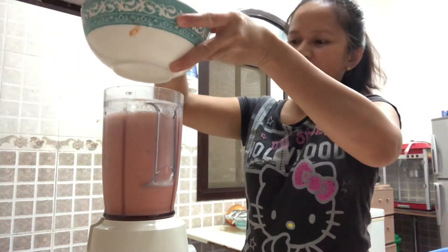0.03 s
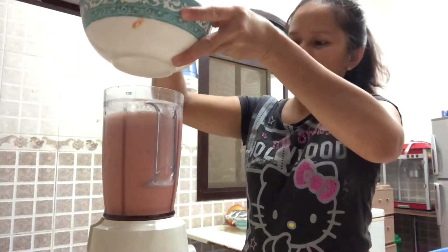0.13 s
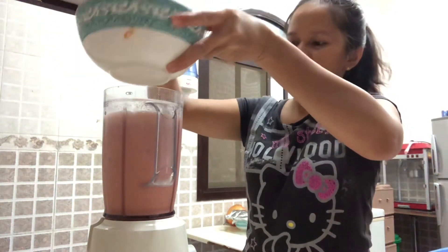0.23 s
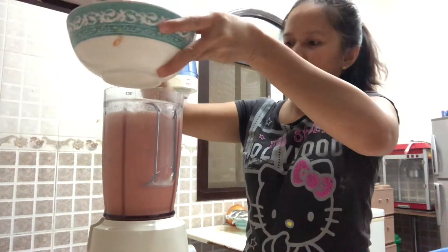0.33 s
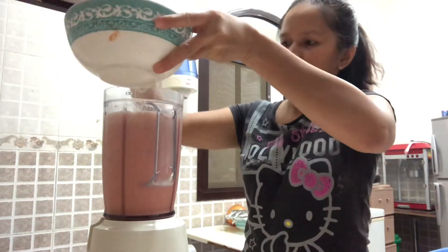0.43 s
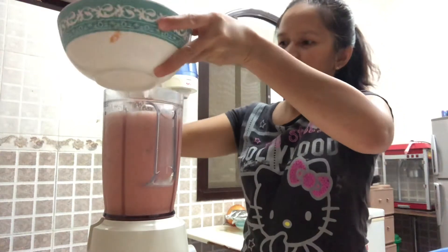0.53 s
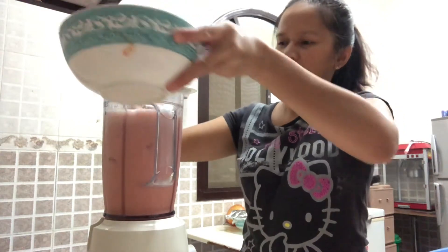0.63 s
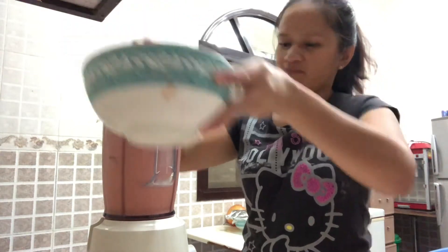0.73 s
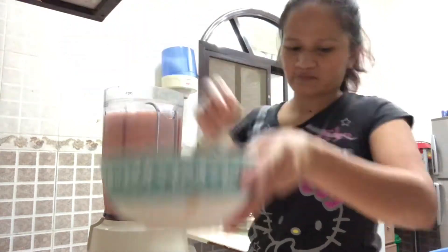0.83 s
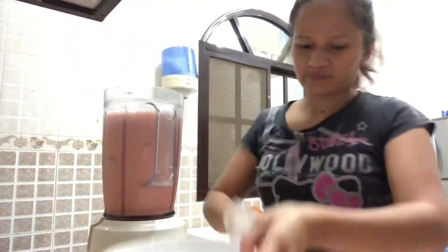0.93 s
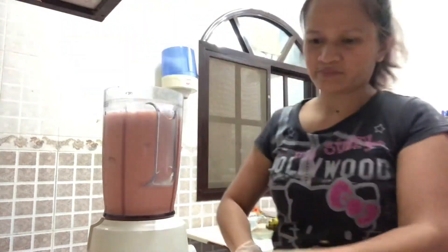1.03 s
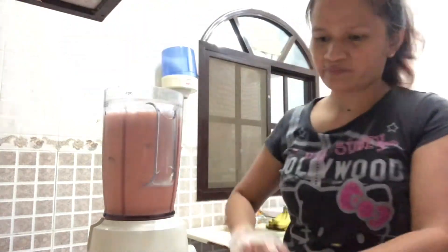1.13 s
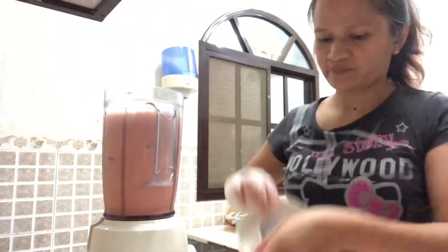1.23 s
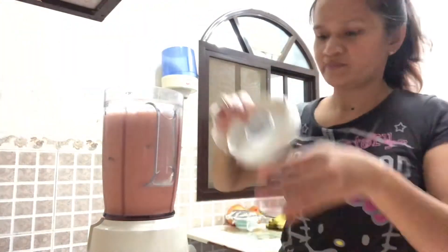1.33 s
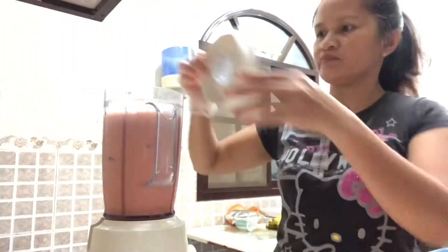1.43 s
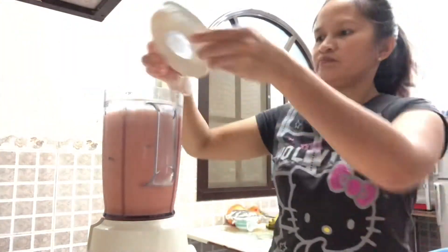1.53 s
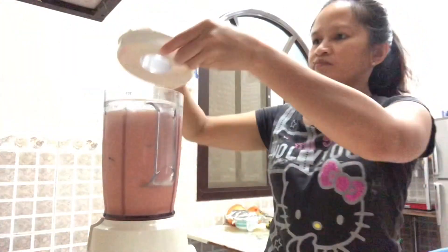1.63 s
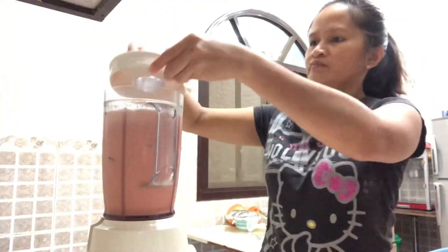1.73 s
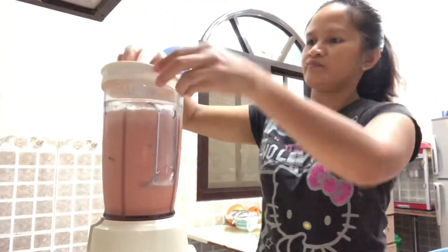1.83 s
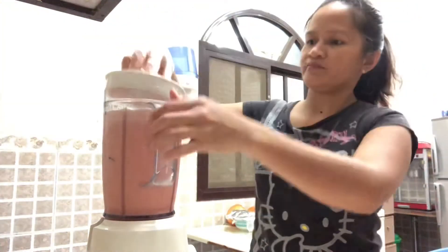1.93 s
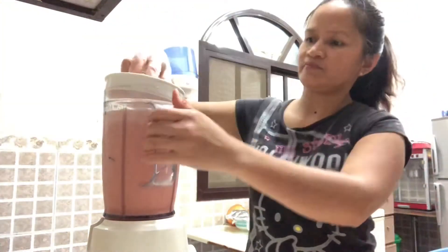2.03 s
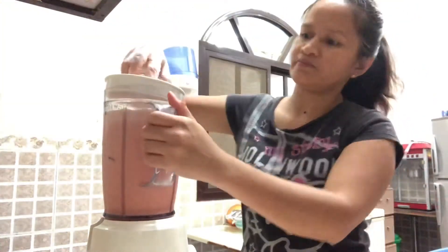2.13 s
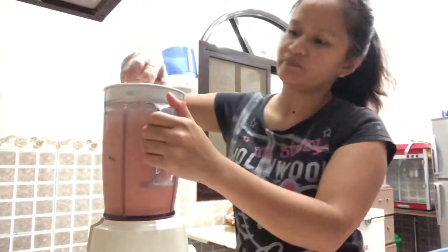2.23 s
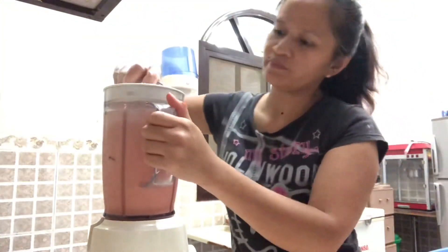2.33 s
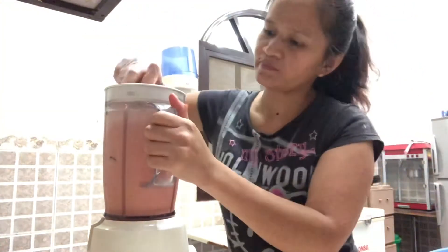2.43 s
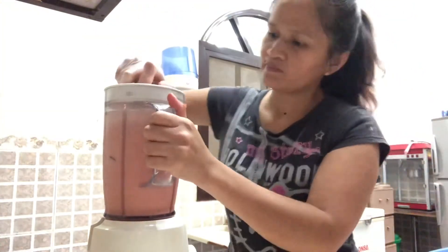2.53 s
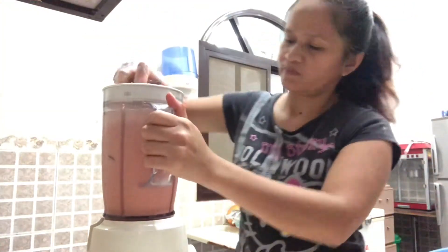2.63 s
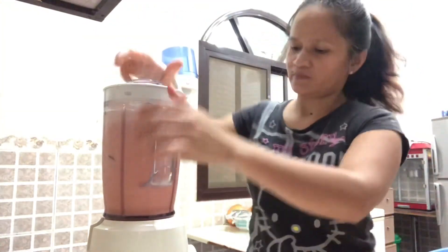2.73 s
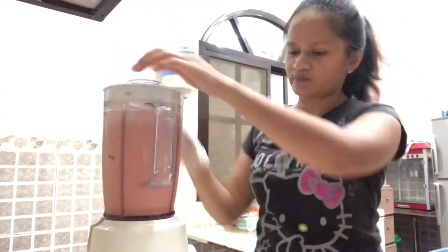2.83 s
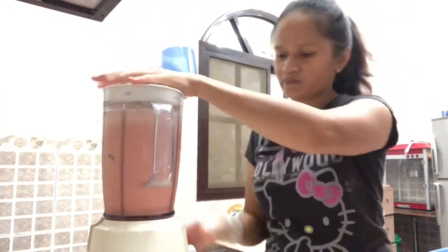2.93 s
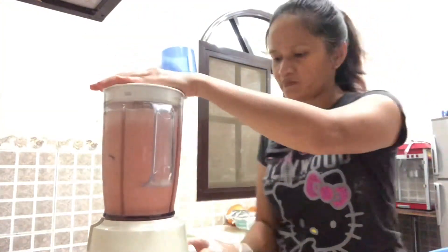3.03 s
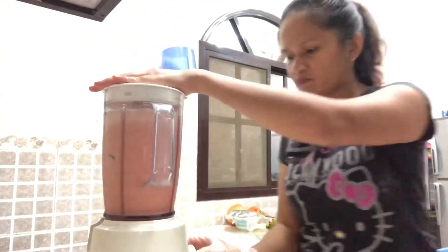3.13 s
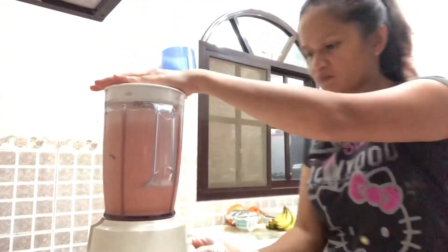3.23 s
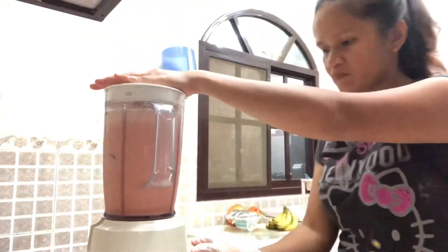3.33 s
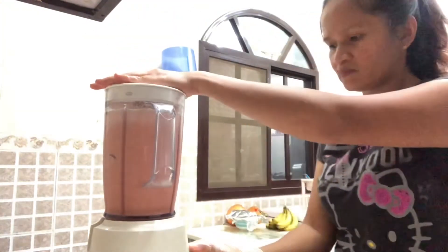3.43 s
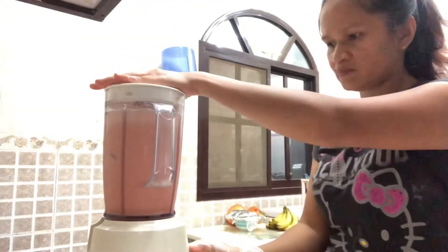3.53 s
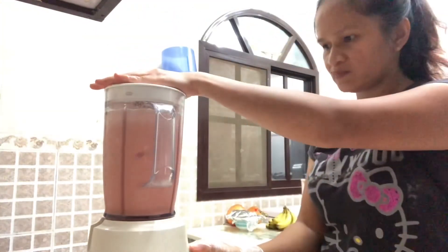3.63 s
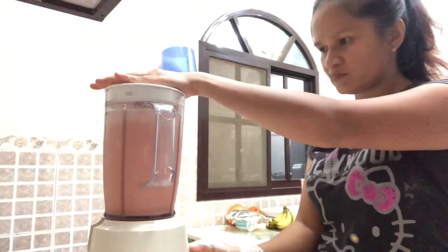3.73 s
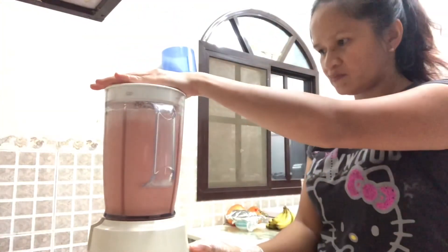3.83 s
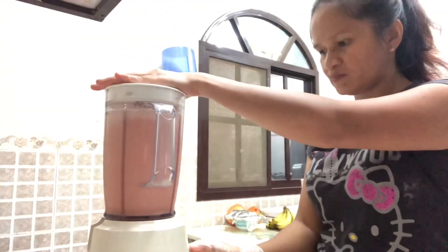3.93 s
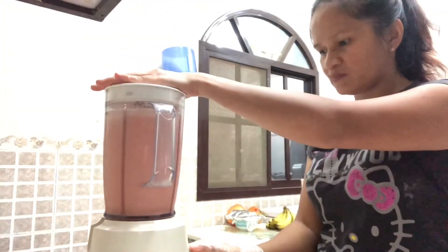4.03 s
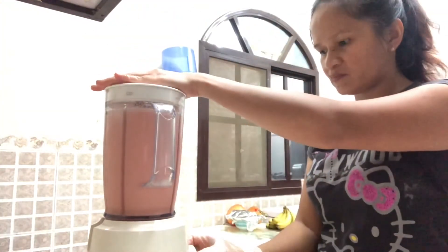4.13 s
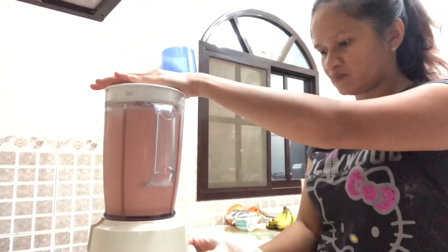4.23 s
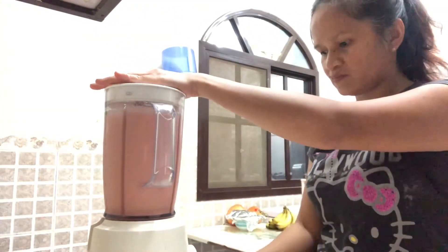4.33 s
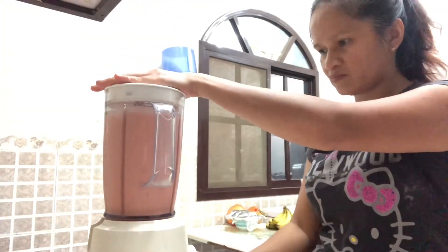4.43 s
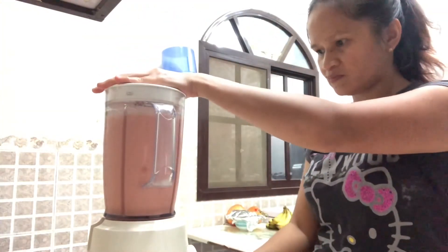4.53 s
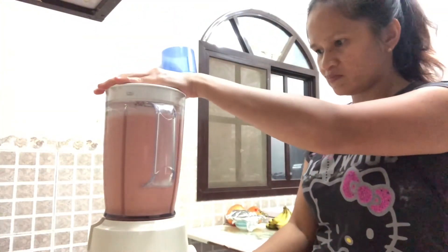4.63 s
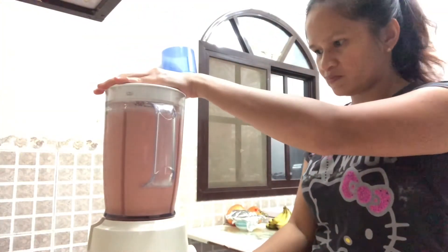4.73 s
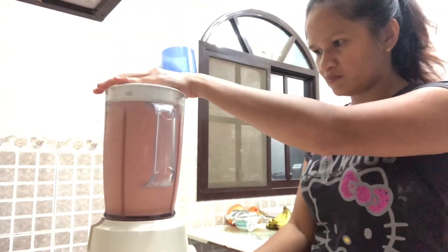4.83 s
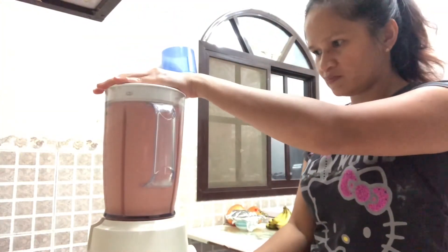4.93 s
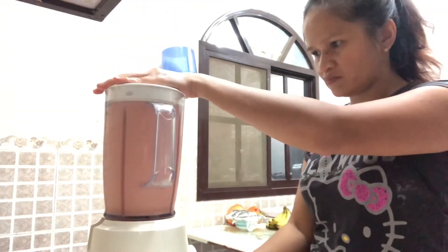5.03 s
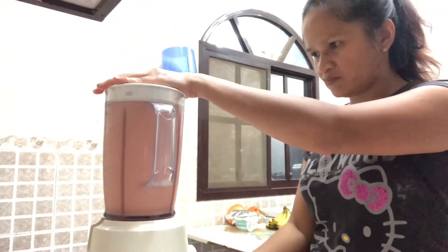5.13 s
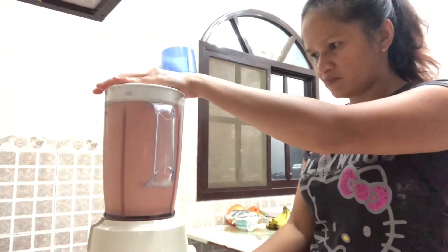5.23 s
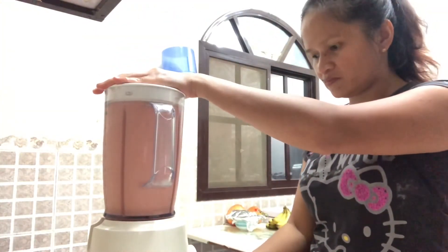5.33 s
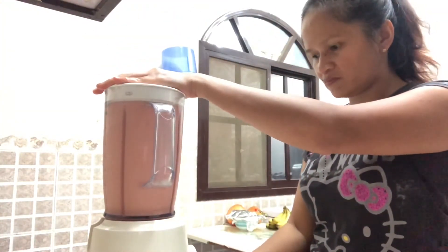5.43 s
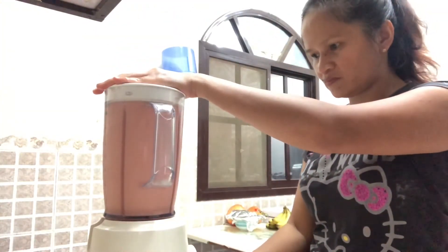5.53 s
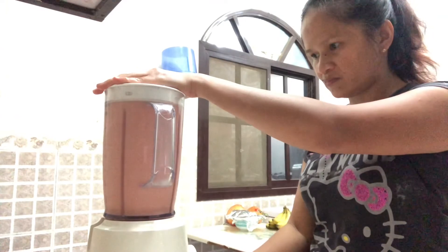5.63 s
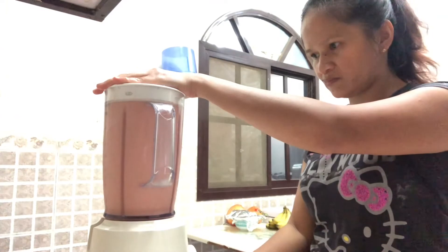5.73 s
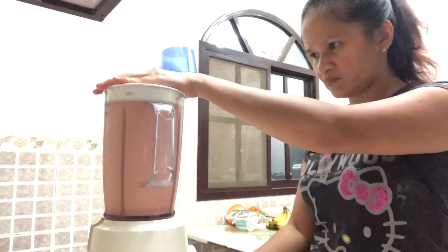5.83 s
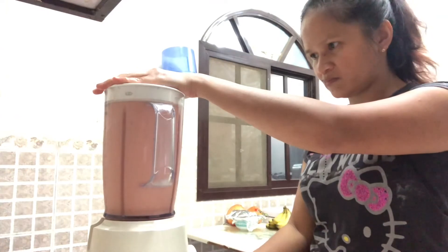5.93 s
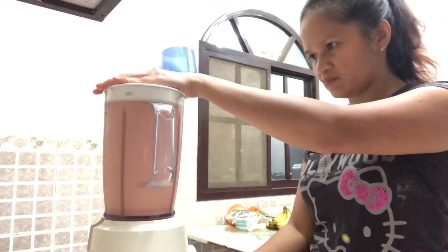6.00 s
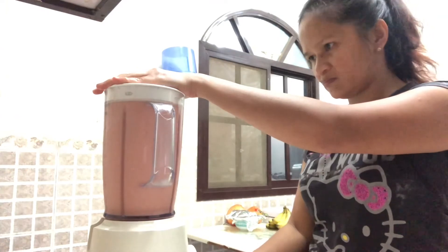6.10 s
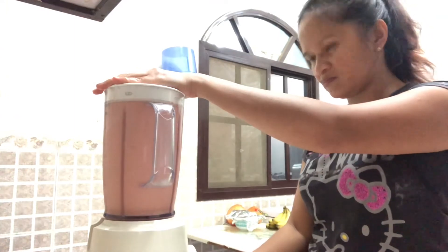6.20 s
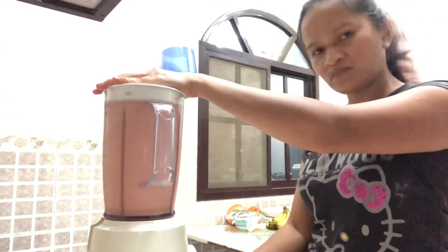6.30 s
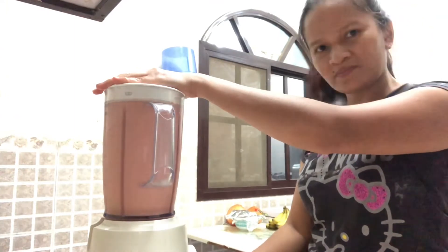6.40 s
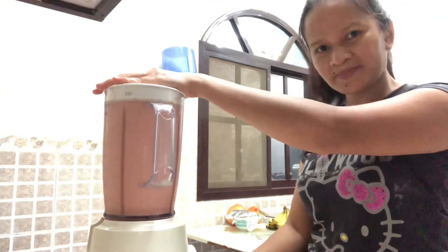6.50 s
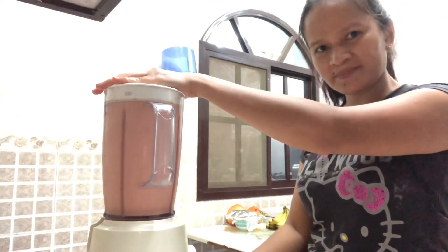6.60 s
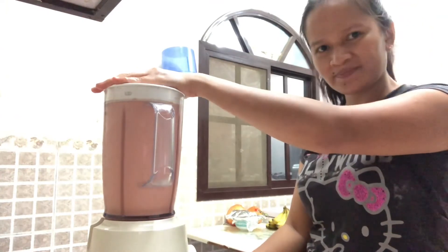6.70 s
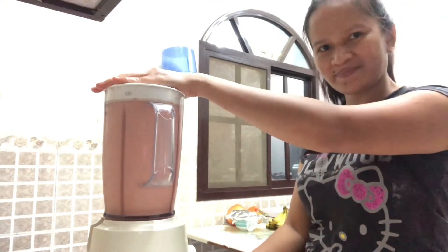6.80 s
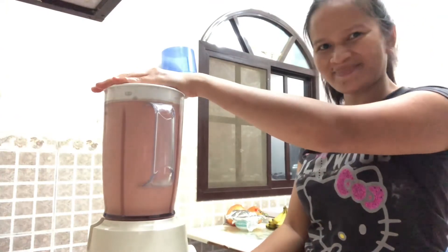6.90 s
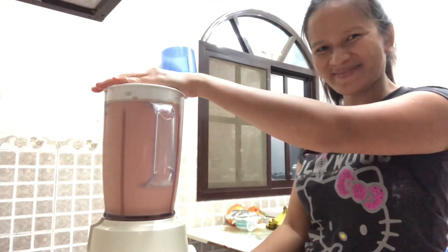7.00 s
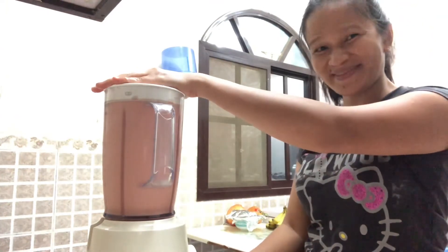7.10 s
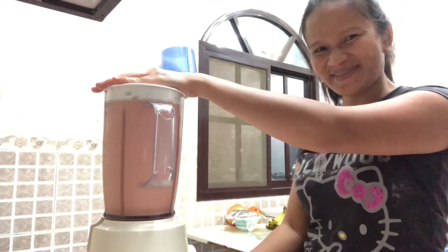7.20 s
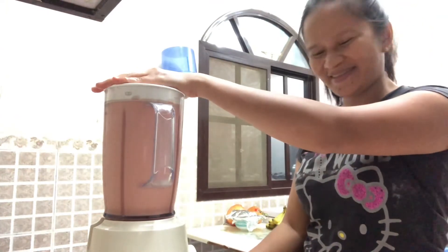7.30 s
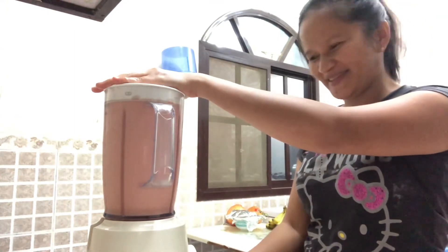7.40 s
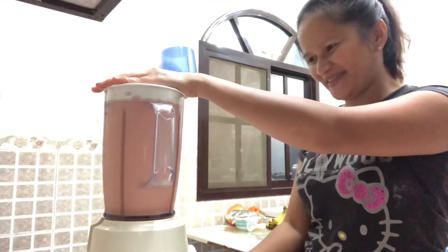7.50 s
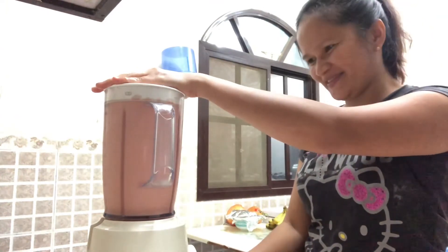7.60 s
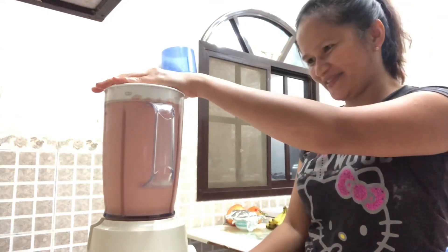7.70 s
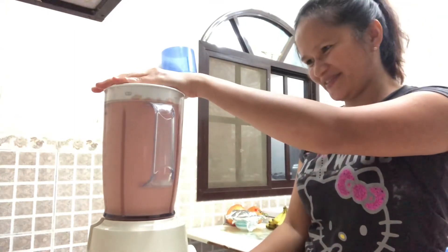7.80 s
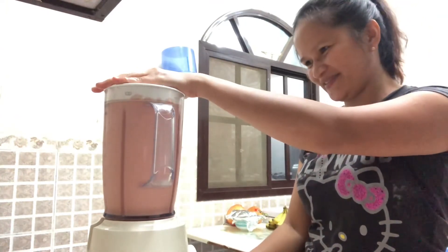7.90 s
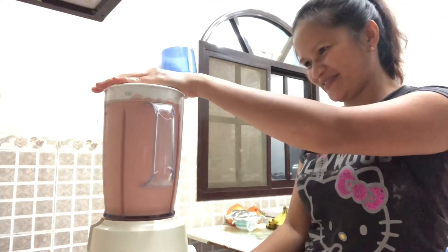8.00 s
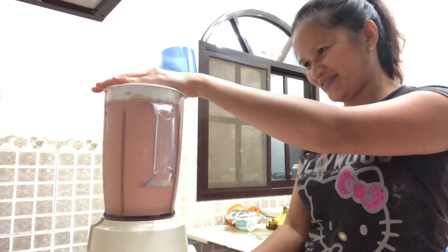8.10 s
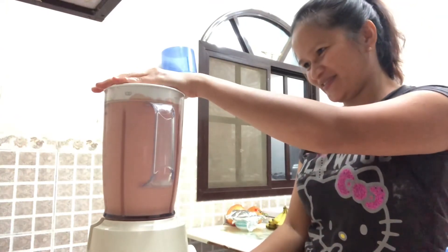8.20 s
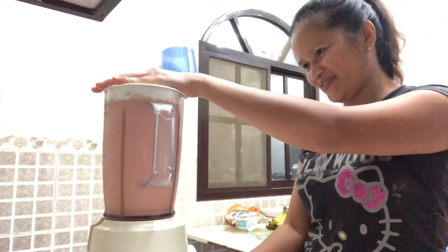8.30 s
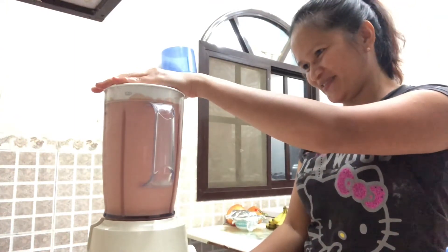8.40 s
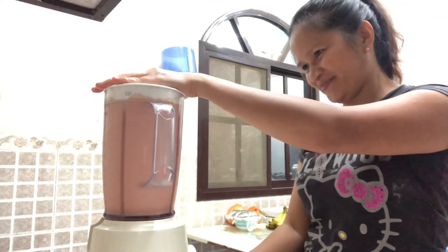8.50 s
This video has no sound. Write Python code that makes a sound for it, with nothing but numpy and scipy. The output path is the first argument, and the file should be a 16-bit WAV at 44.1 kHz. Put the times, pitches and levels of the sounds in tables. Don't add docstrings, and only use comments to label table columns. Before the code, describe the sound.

Ice slides and clinks, a bowl clacks down, a plastic lid snaps on, then a blender stutters, restarts and roars steadily through ice in a kitchen.

```python
import sys
import numpy as np
from scipy import signal
from scipy.fft import rfft, irfft
from scipy.io import wavfile
from scipy.ndimage import uniform_filter1d, map_coordinates

SR = 44100
rng = np.random.default_rng(int(sys.argv[2]) if len(sys.argv) > 2 else 0)


def undo_db(level):
    steps = np.asarray(level, float) / 20
    return 10 ** steps


def generate_wav(sig):
    pcm = np.round(np.clip(np.atleast_2d(sig).T, -1, 1) * 32767).astype(np.int16)
    wavfile.write(sys.argv[1], SR, pcm)


N = 377231

# mute_from_s, mute_to_s, fade_out_s, fade_in_s
SILENCE = (0.0854, 0.107, 0.006, 0.02)


def unit(x):
    return x / np.sqrt(np.mean(x ** 2) + 1e-20)


def along(points, hz):
    f, v = np.transpose(points)
    return np.interp(np.log(hz + 1), np.log(f + 1), v)


def curves(rows):
    s, *cols = np.transpose(rows)
    t = np.arange(N) / SR
    gate = np.clip(np.minimum(t - s[0], s[-1] + .02 - t) / .012, 0, 1)
    return [np.interp(t, s, c) for c in cols] + [gate]


def until(s, over_s, db):
    return db * np.clip((s - np.arange(N) / SR) / over_s, 0, 1)


def wobble(rate, size=N):
    steps = np.arange(0, size + 64, 64)
    knots = rng.standard_normal(int(size * rate / SR) + 5)
    return np.interp(np.arange(size), steps, map_coordinates(knots, [steps * rate / SR]))


def coloured(x, gain):
    m = 16384
    log_gain = np.log(gain(np.fft.rfftfreq(m, 1 / SR)) + 1e-6)
    cep = irfft(log_gain, m)
    cep[1:m // 2] *= 2
    cep[m // 2 + 1:] = 0
    response = irfft(np.exp(rfft(cep)), m)[:m // 2]
    return signal.oaconvolve(x, response)[:N]


def shaped(x, spectrum):
    return unit(coloured(x, lambda hz: undo_db(along(spectrum, hz))))


def ring(modes, t):
    out = 0
    for hz, db, t60 in modes:
        out = out + undo_db(db + rng.normal(0, 1.5) - 60 * t / t60) * np.sin(2 * np.pi * hz * t)
    return out


def burst(t, lo_hz, hi_hz, t60):
    band = signal.butter(2, [lo_hz, hi_hz], "band", fs=SR, output="sos")
    force = np.array([rng.standard_normal(len(t)) * undo_db(-60 * t / t60), t == 0])
    force[0, 0] = 6
    x, even = signal.sosfilt(band, force)
    even = even * np.linalg.norm(x) / np.linalg.norm(even)
    return np.array([x, even]) / np.abs(x).max()


def chips(per_s, spread_db):
    struck = rng.random(N) < per_s / SR
    return unit(struck * rng.standard_normal(N) * undo_db(spread_db * rng.exponential(size=N)))


def background():
    # pitch_hz, level_db
    hum_tones = [(199.2, -48.5), (226.1, -51.5), (274.5, -52), (398.4, -52), (452.2, -48.5), (500.6, -54),
                 (549.1, -50), (597.5, -48.5), (694.4, -77), (818.3, -56), (990.5, -57.5)]
    # freq_hz, density_db
    air_colour = [(18, -89), (30, -66), (125, -7.5), (167, -37), (190, -4.5), (283, 0), (332, -6),
                  (455, -5.5), (732, -7.5), (792, -7.5), (1090, -12.5), (1840, -12.5), (4770, -26.5),
                  (15200, -39.5), (16500, -63)]
    t = np.arange(N) / SR
    hum = 0
    for hz, db in hum_tones:
        level = undo_db(db + 1.5 + wobble(7.8))
        hum = hum + level * np.sin(2 * np.pi * hz * t + wobble(6.8))
    return hum + undo_db(-43.5 + 0.44 * wobble(2.73)) * shaped(rng.standard_normal(N), air_colour)


def scrape():
    # time_s, level_db
    rubs = [
        [(0.0, -35.5), (0.085, -38.5)],
        [(0.11, -38), (0.17, -45), (0.238, -54), (0.402, -57), (0.46, -55), (0.532, -46), (0.67, -63),
         (0.866, -59), (1.0, -81)],
        [(1.75, -75), (1.87, -54), (2.0, -64), (2.12, -52), (2.22, -66), (2.33, -60), (2.42, -75), (2.5, -100)],
    ]
    # freq_hz, density_db
    slide_colour = [(710, -23), (1200, -1), (1380, -2), (1720, -6), (3260, 8), (13800, -6), (16000, -12),
                    (16500, -29)]
    db, gate = curves(sum(rubs, []))
    grit = shaped(chips(per_s=4000, spread_db=1.0), slide_colour)
    return gate * undo_db(db + 0.98 * wobble(39)) * grit


def handling_thud():
    # level_db, from_hz, to_hz
    rumble = (-34, 69, 140)
    out, t = np.zeros((2, N)), np.arange(SR // 8) / SR
    db, lo_hz, hi_hz = rumble
    out[:, :len(t)] = undo_db(db) * burst(t, lo_hz, hi_hz, t60=0.79) * (t < SILENCE[0])
    return out


def taps():
    # start_s, peak_db, knock_db, tick_db, ring_hz
    ice_taps = [(0.023, -14, -28, -15, 4400), (0.055, -23, -27, -23, 2730), (0.16, -38.5, -14, 5, 3090),
                (0.1664, -22.5, -12, -9, 3220), (0.173, -27, -16, -7, 1490), (0.181, -26, -23, -11, 5000),
                (0.2044, -38, -7, -1, 2180), (0.2424, -39, 15, -5, 1870), (0.281, -36, -12, -6, 1800),
                (0.302, -37, -7, 0, 3140), (0.4145, -42, -11, 4, 3790), (0.4274, -43, -7, 7, 5390),
                (0.434, -39, -10, 7, 5340), (0.46, -31, -12, 3, 5330), (0.466, -30, -25, -12, 5310),
                (0.471, -32, -25, -12, 5400), (0.4776, -18, -16, -5, 2160), (0.481, -17, -18, -4.5, 3470),
                (0.5089, -20.5, -2, -21, 1820), (0.515, -25, -3, -16, 1110), (0.5203, -23, -6, -18, 1790),
                (0.527, -22, -2, -16, 1300), (0.535, -28, -2, -14, 1800), (0.6345, -21, 3, -14, 1780),
                (0.658, -38, 8, -15, 900), (0.7432, -29.5, -23, -13, 1790), (0.7804, -30, -20, -10, 5230),
                (0.79, -37, -17, -10, 5300), (0.8088, -29, -13, -12, 1910), (0.8297, -42, -6, -2, 1790),
                (0.889, -47, -1, 6, 1590)]
    # start_s, peak_db, knock_db, tick_db, ring_hz
    lid_taps = [(1.7694, -33, -9, -13, 2790), (1.7787, -36, 8, -10, 1700), (1.8634, -34, 3, 1.5, 1650),
                (1.8766, -25, 5, -8, 2680), (1.921, -40, -6, 3, 2370), (1.98, -35, -13, -10, 1610),
                (1.997, -36, -5, -20, 2800), (2.035, -36, -6, -21, 3500), (2.074, -43, 16, -22, 2500),
                (2.088, -46, -5, 0, 2000), (2.1105, -15.5, -2, -20, 3230), (2.1208, -33.5, 19, -3, 3000),
                (2.1386, -42, -3, 0, 1780), (2.161, -36, -7, 1.5, 1960), (2.1714, -40, -2, 1, 1980),
                (2.2533, -33, -10, -19, 1750), (2.294, -52, -9, 2, 2000), (2.321, -31.5, 1, -14, 1800),
                (2.3322, -29.5, 3, -6, 3250), (2.395, -32, -15, -21, 1660), (2.4399, -4.5, -8, -10.5, 1770),
                (2.4407, -12, -14, -22, 3740), (2.6256, -36, -4, -4.5, 1840), (2.8354, -42.5, 5, 1, 3500),
                (2.8918, -38, -15, 2, 3500), (2.9412, -32, 5, -23, 1740)]
    # start_s, peak_db, knock_db, tick_db, ring_hz
    jolts = [(3.353, -7, -12, -22, 3300), (3.355, -4, -12, -27, 1670), (3.361, -6, -9, -26, 1690),
             (3.497, -11, -15, -22, 2400), (3.5149, -3, -17, -31, 1680), (3.5725, -4, -23, -12, 1590),
             (3.992, -7.5, -10, -4, 1680), (4.107, -13, -18, -10, 1700), (4.139, -10, -15, -19, 1760),
             (4.16, -15, -22, -19, 1740), (4.195, -20, -18, -12, 1780), (4.252, -25, -20, -21, 1730),
             (4.285, -27, -16, -15, 1750), (4.326, -28.5, -19, -2, 2970), (4.3858, -25.5, -11, -9, 1970),
             (4.4, -36, -9, 1, 1910), (4.4228, -13, 1.5, 3, 1740)]
    hollow_hz = (565, 497, 832)
    # pitch_hz, level_db, t60_s
    jar_modes = [(168, -19.5, 0.13), (413, -4, 0.038), (615, -4, 0.068), (764, -11.5, 0.056),
                 (1240, -13, 0.023)]
    out, t = np.zeros((2, N + SR)), np.arange(SR // 8) / SR
    onset = 1 - np.exp(-t / 0.002)
    for rows, knock_hz in zip((ice_taps, lid_taps, jolts), hollow_hz):
        for s, db, knock_db, tick_db, hz in rows:
            crack = 0.71 * burst(t, 480, 3250, t60=0.032)
            plastic = 0.52 * burst(t, 0.89 * hz, 1.085 * hz, t60=0.036)
            knock = undo_db(knock_db) * ring(jar_modes + [(knock_hz, -1, .065)], t) * onset
            tick = undo_db(tick_db + 13.5) * burst(t, 2940, 11300, t60=0.017)
            out[:, round(s * SR):][:, :len(t)] += undo_db(db) * (crack + plastic + knock + tick)
    return out[:, :N]


def bowl():
    # start_s, peak_db, tick_db
    clacks = [
        (1.0206, 3, -10.5),
        (1.0404, 2.5, -12.5),
        (1.0497, 2, -21),
        (1.0608, -12, -24),
        (1.0687, -9, -24),
        (1.086, -19, -22),
        (1.1, -9.5, -22),
        (1.104, -19, -22),
        (1.113, -24, -24),
    ]
    # pitch_hz, level_db, t60_s
    bowl_modes = [(150, -25, .1), (370, -19, .05), (700, -21, .035), (1000, -8, .03), (1230, -10, .035),
                  (1500, -14, .03), (1770, -3, .017), (1870, 1.5, .026), (2500, -9, .02), (3150, -11, .016),
                  (4700, -18, .01), (7300, -18, .008)]
    out, t = np.zeros((2, N + SR)), np.arange(SR // 8) / SR
    onset = 1 - np.exp(-t / 0.00078)
    for s, db, tick_db in clacks:
        clack = undo_db(-6.0) * ring(bowl_modes, t) * onset
        rattle = 0.17 * burst(t, 550, 2400, t60=0.093)
        tick = undo_db(tick_db + 5) * burst(t, 5800, 13000, t60=0.023)
        out[:, round(s * SR):][:, :len(t)] += undo_db(db) * (clack + rattle + tick)
    return out[:, :N]


def kitchen(x, size):
    # freq_hz, t60_s
    tile_decay = [(200, 0.47), (1500, 0.27), (6000, 0.56), (14000, 0.26)]
    out = np.zeros(N + SR)
    for start in range(0, np.flatnonzero(x).max(), size):
        hz, t, z = signal.stft(rng.standard_normal(SR // 2), SR, nperseg=256)
        decay = undo_db(-60 * t / along(tile_decay, hz)[:, None])
        tail = signal.istft(z * decay, SR, nperseg=256)[1]
        wet = signal.fftconvolve(x[start:start + size], tail / np.linalg.norm(tail))
        out[start + 260:][:len(wet)] += wet
    return out[:N]


def housing(hz, blur=1):
    # pitch_hz, width_hz, level_db
    resonances = [(1246, 11.3, -4), (1340, 18, -8.5), (1680, 59, -2), (1948, 41, -2.5), (2054, 20, -5),
                  (2388, 28.5, 0.5), (3286, 68, -10.5), (3600, 60, -10), (4005, 72, -13.5),
                  (4672, 16, -10.5), (4913, 41, -15), (6020, 47, -33)]
    # freq_hz, density_db
    shell_colour = [(530, -62), (900, -4.5), (1110, -36), (1220, -17), (1670, 15.5), (2180, -4.5),
                    (2440, 4), (2770, -0.5), (7000, -15), (9100, -92), (15400, -120)]
    peaks = 0
    for centre, width, db in resonances:
        detuning = 2 * (hz - centre) / (blur * width)
        peaks = peaks + undo_db(2 * db) / blur / (1 + detuning ** 2) ** 1.9
    return np.sqrt(peaks + undo_db(2 * (along(shell_colour, hz) - 18.5)))


def blender():
    # time_s, roar_db
    pulse = [
        (3.37, -23.5),
        (3.49, -23.5),
        (3.52, -15),
        (3.57, -13),
        (3.6, -9),
        (4.06, -10.5),
        (4.13, -27.5),
        (4.2, -36),
        (4.27, -40),
        (4.404, -47.5),
    ]
    # time_s, roar_db
    grind = [
        (4.417, -42),
        (4.418, -15.5),
        (4.46, -9.5),
        (4.734, -9.5),
        (4.782, -14),
        (4.9, -11.5),
        (5.05, -12),
        (6.55, -13.5),
        (8.55, -14),
    ]
    # time_s, whole_cubes_share
    cubes_left = [
        (3.36, 1),
        (3.5, 1),
        (3.56, 0.84),
        (4.72, 0.92),
        (4.85, 0.15),
        (5.5, 0.06),
        (8.55, 0.01),
    ]
    # freq_hz, density_db
    packed_colour = [(530, -42.5), (900, -15), (1110, -16.5), (1160, -26), (1230, -1.5), (1390, -11.5),
                     (1670, 1), (2110, -14), (2460, -6.5), (2770, -22.5), (2920, -12.5), (3320, -13.5),
                     (4480, -20), (4880, -25), (7000, -26), (9100, -29), (15400, -120)]
    # freq_hz, density_db
    crunch_colour = [(18, -45), (30, -106), (70, -33.5), (223, -13), (251, -15), (310, -6.5), (401, -5),
                     (466, -10.5), (542, -2), (630, -2), (732, -8), (814, -3.5), (1100, -14.5), (1430, -44),
                     (2420, -120)]
    # freq_hz, density_db
    slush_colour = [(250, -73), (380, -5.5), (460, -10.5), (615, -2), (708, -11.5), (813, 1), (1100, -19.5),
                    (1430, -55), (2420, -120)]
    # freq_hz, density_db
    spray_colour = [(2650, -36), (4500, -17), (4880, 5), (8780, 2), (11400, -2.5), (15100, -2), (15900, -3),
                    (16500, -54)]
    # freq_hz, density_db
    hiss_colour = [(2650, -30), (4500, -4.5), (4830, -3), (5300, -10.5), (5810, 2), (6340, -1.5), (6880, 2),
                   (7580, -4.5), (8500, 2.5), (11200, -11), (14000, -12), (15900, -17), (16500, -50)]
    # freq_hz, density_db
    churn_colour = [(30, -67), (60, -30), (120, -4), (180, 4.5), (250, -22.5), (340, 4), (430, 0.5),
                    (600, -42)]
    # in_slush_db, among_cubes_db
    crunch_range = (-10.5, -6.5)
    # in_slush_db, among_cubes_db
    hiss_range = (-10, -12)
    # until_s, over_s, extra_crunch_db
    idle_rattle = (3.5, 0.094, 3.9)
    # until_s, over_s, hiss_db
    unbroken = (3.6, 0.048, -3)
    # from_s, to_s
    power_off = (4.06, 4.41)

    roar_db, gate = curves(pulse + grind)
    load = np.clip(curves(cubes_left)[0], 0, 1)
    crunch_db = np.interp(load, (0, 1), crunch_range) + until(*idle_rattle)
    hiss_db = np.interp(load, (0, 1), hiss_range) + until(*unbroken)
    lurch = wobble(25)
    coasting = until(power_off[1], .02, 0.93) - until(power_off[0] + 0.048, 0.03, 1)
    roar_db = roar_db + 5 * wobble(30.2) * coasting
    mains = 1 + 0.054 * np.sin(2 * np.pi * 100 * np.arange(N) / SR)
    ice = chips(per_s=900, spread_db=0.5)

    def drive(share):
        return share * ice + rng.standard_normal(N)

    def blend(cubes, slush):
        return np.sqrt(load) * cubes + np.sqrt(1 - load) * slush

    slush_roar = unit(coloured(drive(0.19), lambda hz: housing(hz, blur=4)))
    roar = undo_db(-2.0 + 0.23 * lurch) * mains * blend(shaped(drive(0.91), packed_colour), slush_roar)
    crunch = blend(shaped(drive(0.48), crunch_colour), shaped(drive(0.54), slush_colour))
    crunch = undo_db(crunch_db - 2.5 + 0.95 * lurch) * crunch
    hiss = blend(shaped(drive(0.83), spray_colour), shaped(drive(0.39), hiss_colour))
    hiss = undo_db(hiss_db - 2.0 + 0.32 * lurch) * hiss
    churn = undo_db(-27.5 + 2.1 * wobble(12)) * np.sqrt(1 - load) * shaped(drive(0.53), churn_colour)
    return gate * undo_db(roar_db) * (roar + crunch + hiss + churn)


def whine(rows, second_db, upper_db, extra=0, count=None):
    multiples = (3, 3.5, 4, 5, 6, 7, 8, 9, 10, 11.5, 12, 12.5)
    order_drive = (-2.5, -7, 7.5, 10, 8.5, 4, 8.5, 2, -2, 10.5, 15.5, 14)
    speed, db, gate = curves(rows)
    on, out = gate > 0, np.zeros(N)
    n = on.sum()
    db = (db + 0.1545 * extra)[on]
    speed = (speed + extra)[on]
    turn = 2 * np.pi * np.cumsum(speed * (1 + .0025 * wobble(30, n))) / SR
    grid = np.arange(0, 7000, 5.)
    gain = housing(np.maximum(grid, 1250), blur=1.9)

    def order(k, level):
        return undo_db(level + 2.6 * wobble(20, n)) * np.sin(k * turn + .25 * wobble(50, n))

    first = undo_db(1.14 * wobble(30, n)) * np.sin(turn)
    upper = 0
    for k, level in zip(multiples[:count], order_drive):
        upper = upper + np.interp(k * speed, grid, gain) * order(k, level)
    out[on] = undo_db(db) * (first + order(2, second_db) + undo_db(upper_db) * upper)
    return gate * out


def splinters():
    # start_s, peak_db
    shards = [(3.5228, -27), (3.5368, -23), (3.5533, -18), (3.5747, -10), (3.5852, -6), (3.6474, -23),
              (3.6471, -11), (3.6695, -9), (3.6925, -14), (3.7344, -11), (3.7513, -11), (3.7743, -10),
              (3.8117, -11), (3.8356, -11), (3.8611, -12), (3.899, -14), (3.9314, -12), (3.9579, -10),
              (3.9933, -8), (4.0217, -10), (4.0292, -10), (4.0496, -4), (4.0861, -7), (4.2028, -25),
              (4.2025, -21), (4.2721, -27), (4.31, -27), (4.3854, -29), (4.4223, -8)]
    # start_s, peak_db
    strays = [(4.4238, -14), (4.4318, -13), (4.5251, -7), (4.5476, -16), (4.6528, -18), (4.8244, -20),
              (5.027, -12), (5.1657, -21), (5.4201, -20), (5.5124, -14), (5.5468, -23), (5.6765, -20),
              (5.878, -17), (5.8985, -15), (5.9815, -23), (6.0217, -24), (6.1215, -22), (6.2412, -20),
              (6.2756, -22.5), (6.5475, -25), (6.7805, -22), (6.9676, -18), (7.4676, -26), (7.5991, -20),
              (7.7184, -18), (7.7687, -17), (7.9084, -26), (8.0421, -25), (8.2869, -27)]
    out, t = np.zeros(N + SR), np.arange(SR // 40) / SR
    for rows, lo_hz in ((shards, 7000), (strays, 9500)):
        for s, db in rows:
            out[round(s * SR):][:len(t)] += undo_db(db + 0.5) * burst(t, lo_hz, 13100, t60=0.028)[0]
    return out[:N]


def racing():
    # start_s, racing_s, gain_turns_per_s, drag_s
    pockets = [(4.784, 0.081, 9.1, 0.26), (4.93, 0.056, 27.5, 0.066), (5.031, 0.049, 21.7, 0.26),
               (5.545, 0.084, 26.1, 0.073), (5.7, 0.051, 16.5, 0.14), (5.941, 0.159, 27.8, 0.02),
               (6.21, 0.094, 33.6, 0.105), (6.46, 0.021, 5.7, 0.02), (6.548, 0.105, 6.9, 0.037),
               (6.722, 0.066, 24.8, 0.12), (6.928, 0.123, 7.0, 0.066), (7.102, 0.108, 22.9, 0.156),
               (7.36, 0.024, 6.9, 0.269), (7.498, 0.083, 24.7, 0.046), (7.641, 0.2, 11.3, 0.066),
               (7.953, 0.098, 5.9, 0.026), (8.079, 0.052, 8.8, 0.02), (8.186, 0.067, 24.9, 0.123),
               (8.332, 0.051, 11.6, 0.076), (8.417, 0.05, 10.3, 0.328)]
    s = np.arange(0, N + 64, 64) / SR
    start, rise, gain, drag = np.transpose(pockets)[..., None]
    climb = np.clip((s - start) / rise, 0, 1)
    fall = np.exp(-np.maximum(s - start - rise, 0) / drag)
    extra = (gain * climb * fall).sum(0)
    return np.interp(np.arange(N) / SR, s, uniform_filter1d(extra, size=21))


def scene():
    # time_s, turns_per_s, whine_db
    spin_up = [
        (3.39, 370, -39),
        (3.42, 398, -33),
        (3.45, 414, -30),
        (3.48, 421, -30),
        (3.51, 426, -33),
    ]
    # time_s, turns_per_s, whine_db
    run = [
        (4.73, 250, -33),
        (4.8, 345, -27),
        (4.85, 387, -29),
        (5.5, 387, -26),
        (8.55, 387, -25),
    ]
    # second_order_db, upper_orders_db
    spin_levels = (0, -6)
    # second_order_db, upper_orders_db
    run_levels = (-9, -0.5)
    contacts, blows = handling_thud() + taps() + bowl()
    motor = blender() + splinters()
    shaft = whine(spin_up, *spin_levels, count=4) + whine(run, *run_levels, extra=racing())
    room = undo_db(-9.0) * kitchen(blows, size=SR // 3)
    room = room + kitchen(undo_db(-10.0) * motor + undo_db(-16.0) * shaft, size=N)
    mono = contacts + motor + shaft + room + scrape() + background()
    return np.array([mono, mono])


def top_cut(x):
    return signal.sosfilt(signal.butter(12, 16880, fs=SR, output="sos"), x)


def record(dry):
    t = np.arange(N) / SR
    start, end, fade_out, fade_in = SILENCE
    mute = np.clip(np.maximum((start - t) / fade_out, (t - end) / fade_in), 0, 1)
    thin = signal.sosfilt(signal.butter(3, 75, "high", fs=SR, output="sos"), dry[0])
    limited = thin / (1 + np.abs(thin / .84) ** 6) ** (1 / 6)
    narrow = signal.sosfilt(signal.ellip(10, .3, 55, 15850, fs=SR, output="sos"), limited)
    narrow = signal.sosfilt(signal.butter(2, 70, "high", fs=SR, output="sos"), narrow)
    return top_cut(np.array([narrow, narrow]) * mute)


dry = scene()
out = record(dry)
generate_wav(out)
```